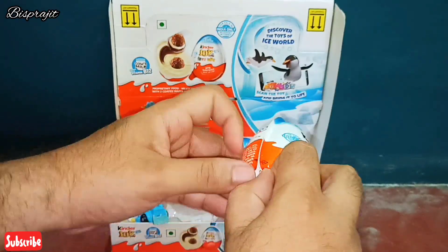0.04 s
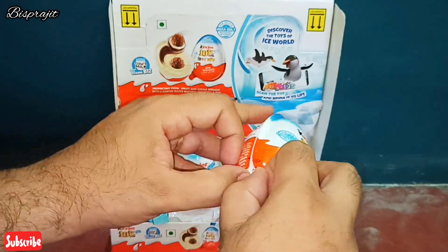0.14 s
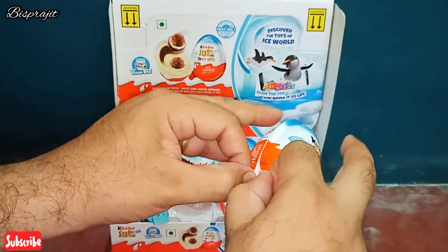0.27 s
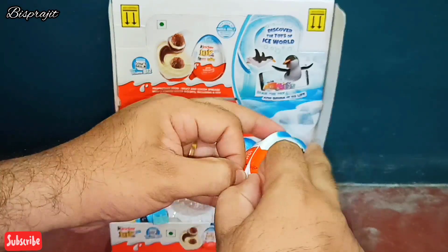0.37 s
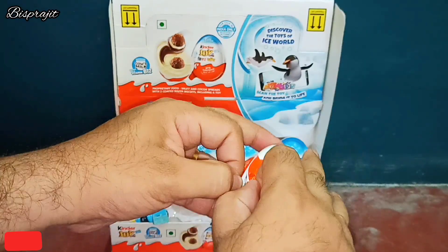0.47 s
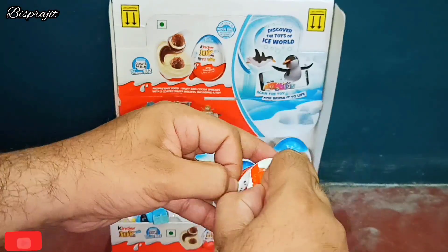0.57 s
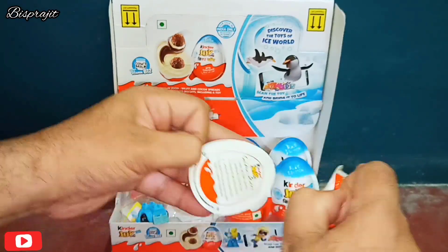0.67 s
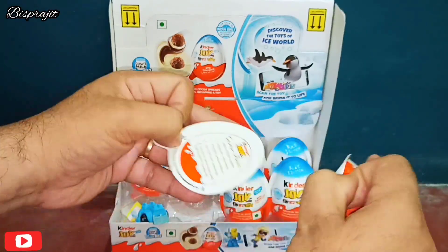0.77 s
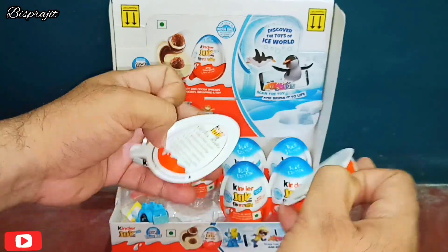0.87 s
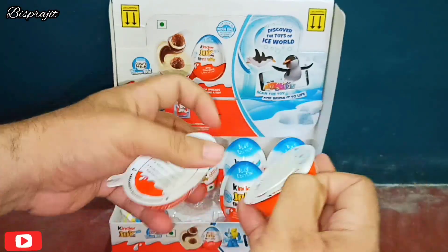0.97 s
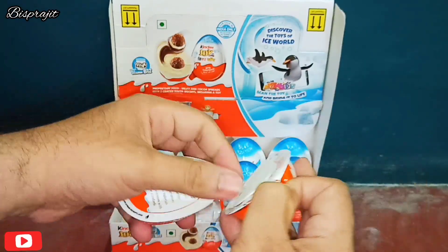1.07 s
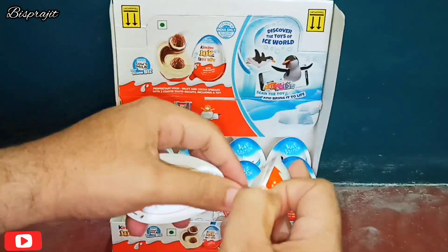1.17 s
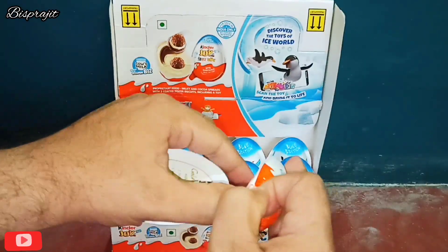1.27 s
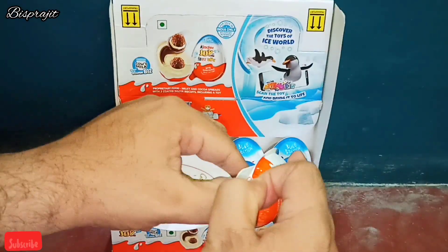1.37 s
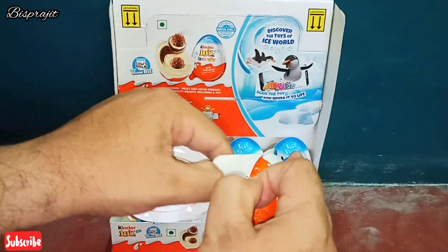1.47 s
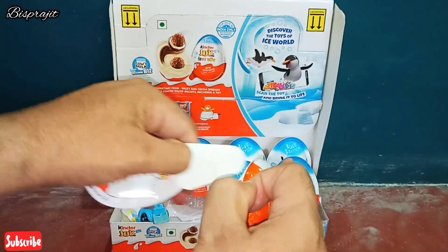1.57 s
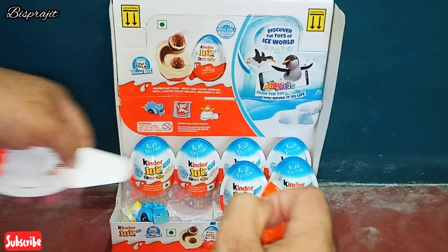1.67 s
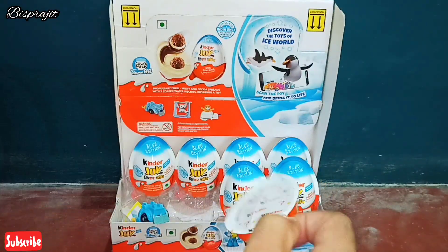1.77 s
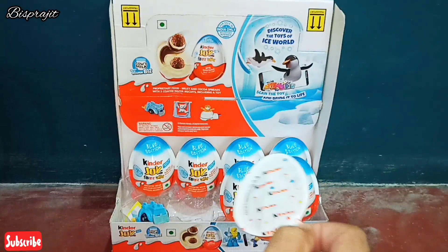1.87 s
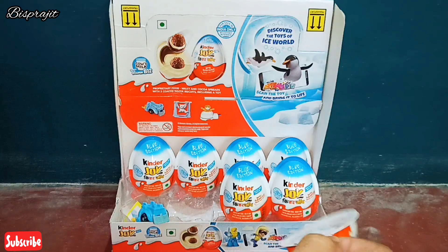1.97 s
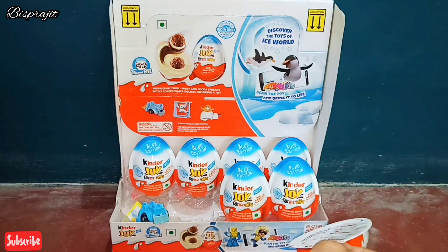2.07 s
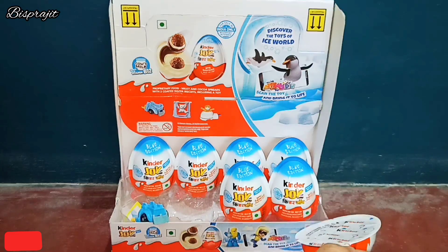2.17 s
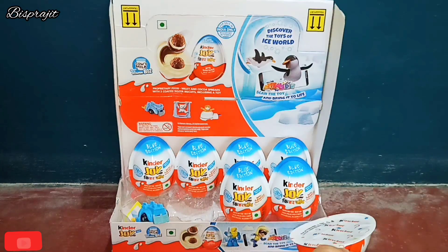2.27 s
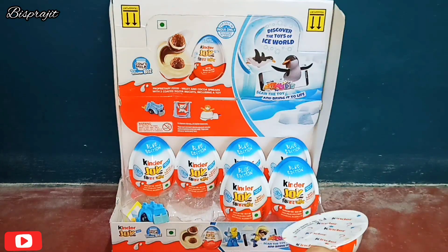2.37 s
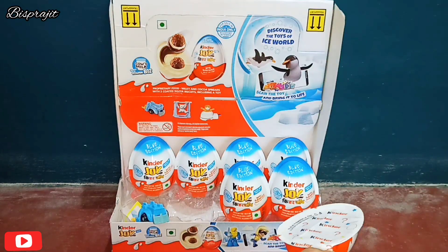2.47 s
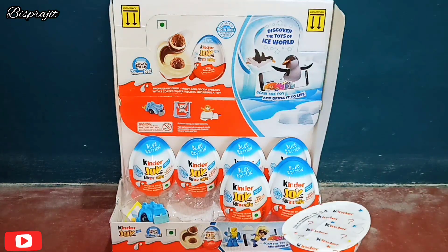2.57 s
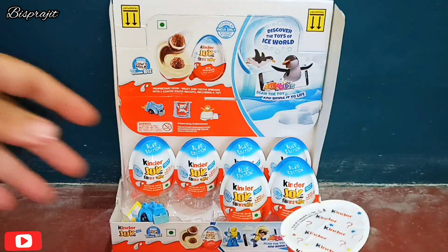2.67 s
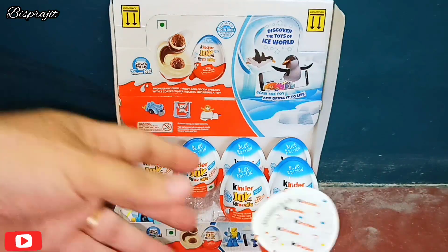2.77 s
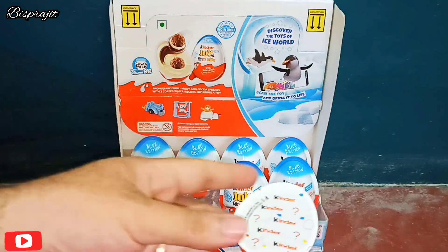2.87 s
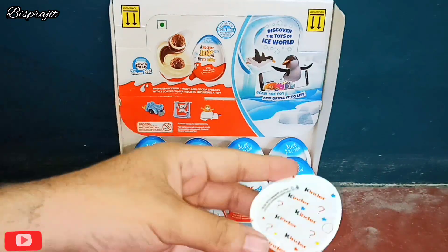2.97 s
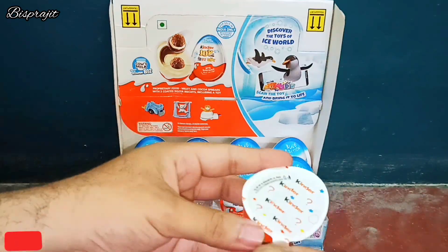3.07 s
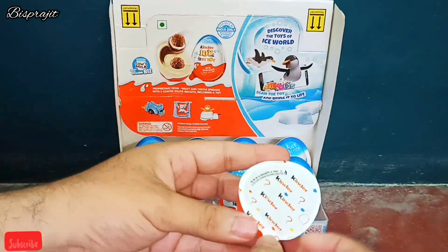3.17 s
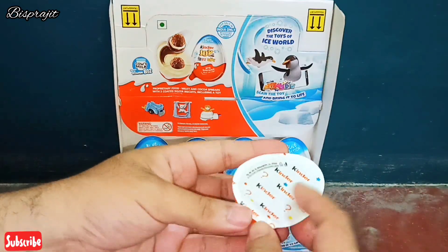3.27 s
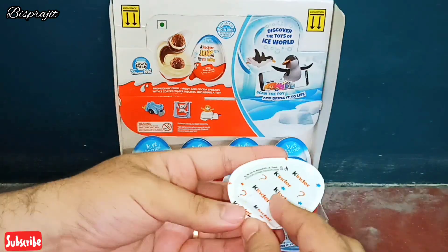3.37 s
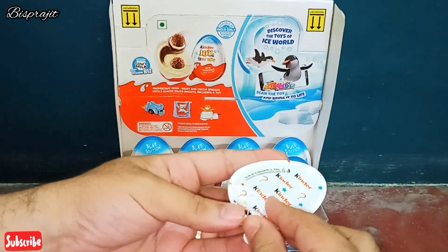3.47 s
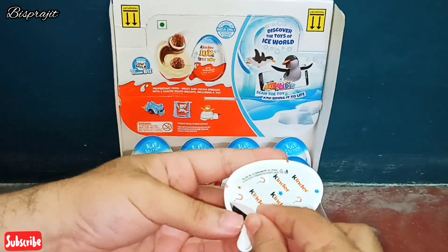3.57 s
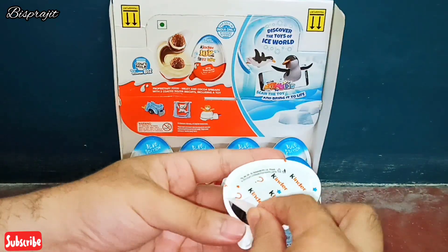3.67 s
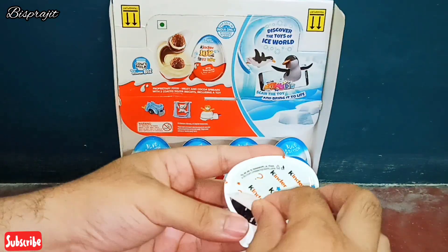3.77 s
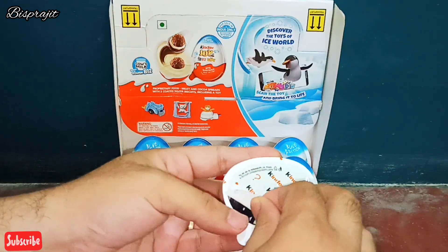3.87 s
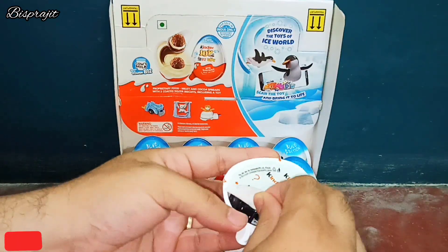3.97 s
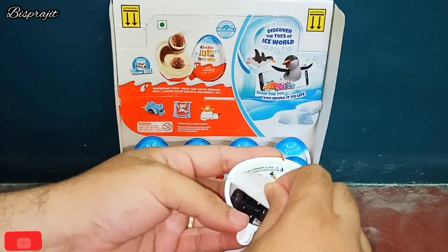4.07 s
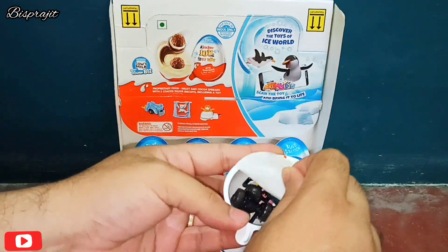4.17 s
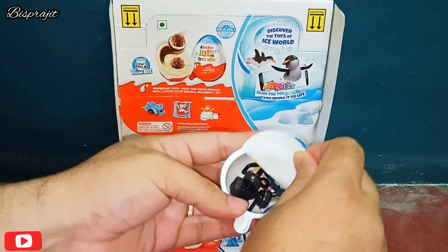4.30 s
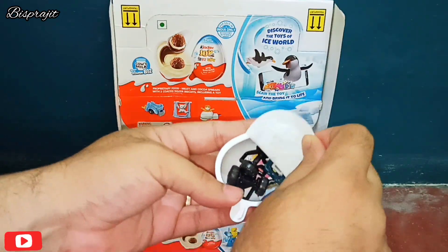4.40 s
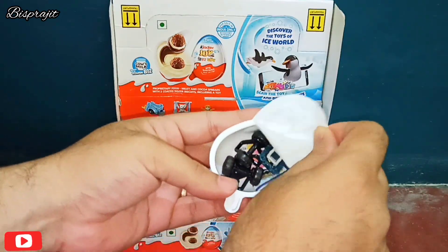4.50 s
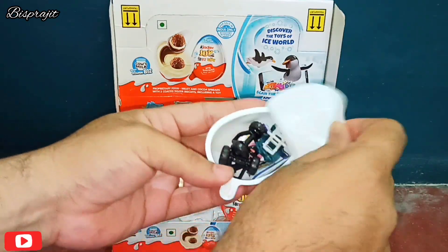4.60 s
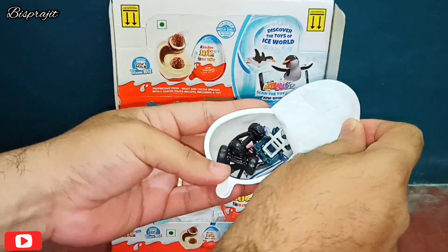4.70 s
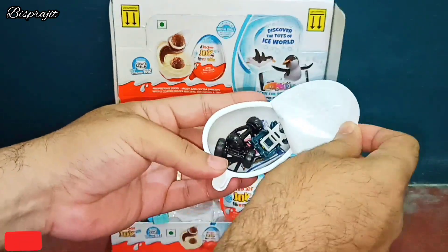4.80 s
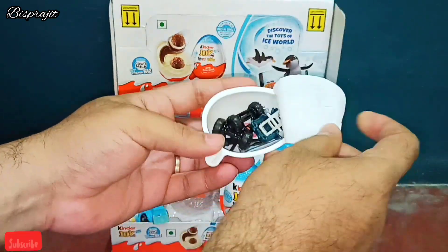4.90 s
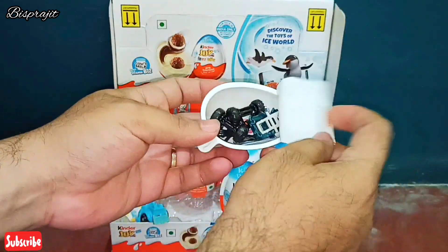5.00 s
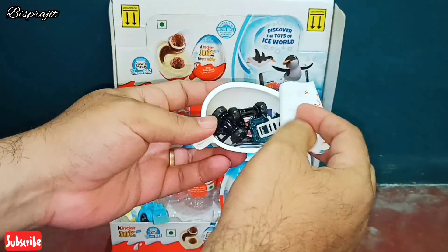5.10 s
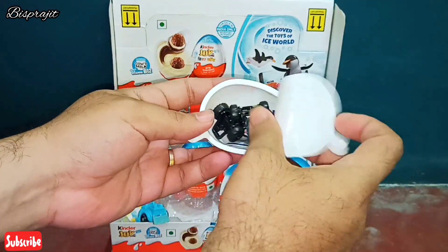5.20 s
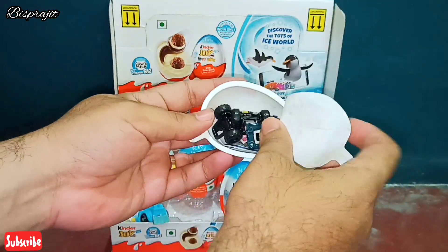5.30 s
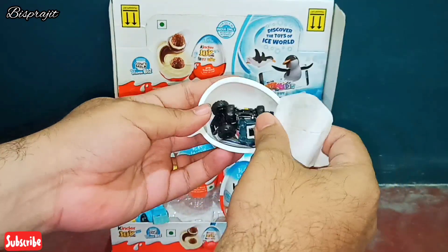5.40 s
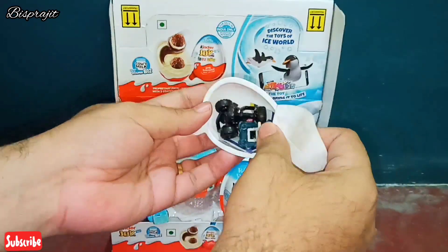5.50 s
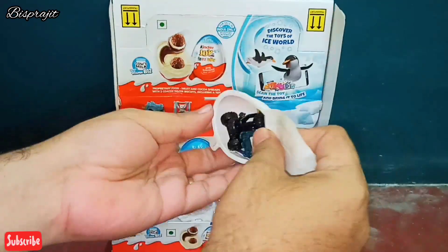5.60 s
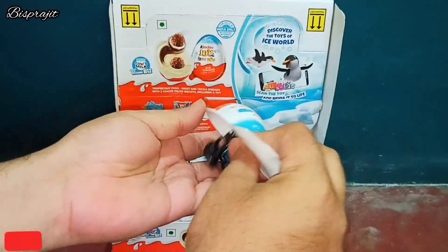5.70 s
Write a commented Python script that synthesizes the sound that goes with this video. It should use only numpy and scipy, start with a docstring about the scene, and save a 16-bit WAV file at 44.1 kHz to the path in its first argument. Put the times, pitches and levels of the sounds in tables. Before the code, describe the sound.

Close to a phone microphone in a small, hard, echoing room, hands split a light plastic egg: a burst of snaps and a short rip, then more sharp cracks and clicks. A quiet lull with faint taps follows, then a nail picks at a foil lid and it peels off in dense, bright, irregular crackles over faint rumble.

```python
"""Faint hiss and a low rumble come first, then small ticks, before hands crack a plastic egg capsule in two.
One half is set down and picked up, and the foil lid peels off the other in bursts of sharp snaps.
Each snap is a buckling impulse that rings a foil facet, the thin shell and the air in the cup; the seam
rips once as a dense run of ticks. Rumble and murmur are filtered noise; short hums are resonated impulses.
A small hard-walled room answers snaps, ticks and hums, close to a phone microphone."""
import sys
import numpy as np
from scipy import signal
from scipy.fft import rfft, irfft
from scipy.io import wavfile
from scipy.ndimage import uniform_filter1d

SR = 44100
rng = np.random.default_rng(int(sys.argv[2]) if len(sys.argv) > 2 else 0)


def output_pcm(signal):
    """Save a mono or channel-first signal as 16-bit PCM at the path in sys.argv[1].

    Samples are clipped to [-1, 1] before scaling.
    """
    pcm = np.clip(np.atleast_2d(signal).T, -1, 1) * 32767
    wavfile.write(sys.argv[1], SR, np.round(pcm).astype(np.int16))


N = 253486
TIME = np.arange(N) / SR

# Buckling of foil and shell: the halves crack apart, fingers pull at one half, the other is set down and
# picked up, a nail picks at the lid, the lid peels back, the loose lid flexes.
# [t/s, level/dB, foil f/Hz, snap length/ms, shell f/Hz, shell/dB re level, room/dB re level]
BUCKLES = [(.2839, -52.5, 4770, 1.65, 1770, -8.5, 1.5), (.5164, -56.5, 5830, 1.8, 1580, -11, 1.5),
           (0.5599, -54, 5100, 1.54, 1720, -10.5, 2), (0.6504, -27.5, 5970, 1.96, 1810, -25, 1),
           (0.6599, -28.5, 6340, 1.28, 1900, -6.5, 0), (0.6656, -29, 5480, 2.5, 1300, 0.5, -5.5),
           (0.6669, -24, 5600, 2.43, 1630, -10.5, -4.5), (.7035, -24.5, 6560, 1.57, 1990, -10, 5.5),
           (0.8494, -31, 4470, 3.06, 1810, -9.5, 0), (0.8703, -25, 3800, 1.27, 2000, -5.5, -2.5),
           (0.8756, -30, 3860, 2, 1940, -3, -5), (0.8932, -45, 3100, 3.9, 1920, 13, -40.5),
           (1.171, -56, 4230, 4.3, 1910, -4.5, -12.5), (1.1875, -44.5, 5500, 2.56, 1400, -3.5, 1),
           (1.229, -40.5, 4810, 1.2, 1570, -8.5, -2), (1.3807, -27, 5300, 1.37, 2383, -8, -3),
           (1.422, -35, 4400, 3.27, 1160, 0.5, 1.5), (1.4387, -23, 5910, 0.58, 1650, -14, -10),
           (1.475, -24, 6250, 1.93, 1570, -7, -1.5), (1.506, -32, 6540, 1.6, 1390, -4.5, -3),
           (1.5219, -17.5, 6710, 2.75, 1390, -7.5, 0.5), (1.645, -37, 5000, 3.9, 1610, 4.5, -1.5),
           (1.7997, -31.5, 4470, 1.2, 1870, 1, -1.5), (1.8385, -42.5, 5100, 2.7, 1640, 3, -6.5),
           (1.8494, -17.5, 6120, 1.24, 1620, -12, -1), (1.859, -29.5, 7850, 1.03, 1510, -0.5, -13),
           (1.9649, -45.5, 4900, 1.3, 1460, 4.5, -4), (2.0677, -48.5, 3640, 3.4, 1430, 1.5, 3.5),
           (2.278, -38, 5520, 2.2, 1390, -1.5, 0.5), (2.3593, -47.5, 4550, 2.7, 1820, 3, -24),
           (2.564, -55, 5360, 0.98, 1650, -14.5, 2.5), (2.964, -61.5, 3470, 3.6, 1557, 10, -1),
           (3.2513, -41, 4300, 3.7, 1405, -6.5, -0.5), (3.3459, -46, 3180, 1.8, 1540, 3, -2),
           (3.434, -25.5, 5000, 1.43, 1870, -15, -1.5), (3.5559, -27.5, 4900, 1.23, 1470, -11, -4.5),
           (3.5666, -34, 5330, 2.9, 1370, -9, -5), (3.729, -41, 7740, 1, 1510, -28, -3.5),
           (3.7932, -55.5, 6400, 1.3, 1350, -14, 2.5), (3.84, -48, 4520, 2.4, 1400, 3, -2.5),
           (3.916, -59, 3400, 1.26, 1350, 4, 1), (3.982, -32.5, 4900, 1.68, 1450, -5, 4),
           (3.9863, -33, 6000, 1.5, 1520, -0.5, -5.5), (4.1009, -48.5, 5320, 1.2, 1470, 10.5, -8),
           (4.1248, -32, 4520, 1.25, 1760, -4.5, -11.5), (4.139, -21.5, 4830, 1.65, 1910, -14.5, -2),
           (4.1471, -30.5, 5400, 1.9, 1580, -18, -16), (4.174, -29.5, 5000, 2, 1610, -3, -2),
           (4.1924, -19, 5060, 1.42, 1810, 0, -10), (4.2018, -19.5, 4570, 1.7, 1790, -5.5, 1.5),
           (4.2064, -15.5, 5900, 1.82, 1990, -4.5, -7.5), (4.323, -29, 4300, 1.5, 1970, -8.5, -1),
           (4.426, -35, 5000, 1.7, 1610, -6, -1.5), (4.4941, -31.5, 7050, 1.26, 1820, -14.5, -1),
           (4.5729, -20, 3900, 2.4, 1610, -10.5, -4), (4.623, -35, 5260, 2.3, 1750, -14, -17),
           (4.6556, -18, 4680, 2.05, 1650, -9, 1), (4.6562, -25, 10000, 1.2, 1730, -23, -5),
           (4.6677, -21.5, 4680, 1.75, 2320, 1, -5.5), (4.8894, -31, 4750, 1.13, 1670, -13, -3.5),
           (4.9455, -39.5, 8200, 2.4, 1400, -11, -10), (5.0594, -32.5, 4800, 2.4, 1830, -7.5, -1.5),
           (5.101, -28, 5660, 0.43, 1670, -30, -1), (5.1254, -43.5, 5980, 2.8, 1190, -6, -0.5),
           (5.2183, -48, 5600, 2.9, 1920, 2, 1), (5.2531, -21.5, 5120, 1.01, 1950, -14.5, -5),
           (5.2731, -31.5, 4940, 4.3, 1840, -5.5, -2.5), (5.28, -32, 5300, 1.2, 2070, -22, -30),
           (5.421, -30, 6100, 1.73, 2010, -17, -3.5), (5.471, -37, 5130, 1, 1750, -9, -2),
           (5.5572, -43, 7100, 2.24, 1800, -10.5, -5.5)]
# Level of the low rumble and murmur, which sinks in pauses [t/s, level/dB]
RUMBLE_LEVELS = [(0.0, -64.5), (0.57, -78), (0.74, -75), (0.97, -51.5), (1.14, -95), (1.25, -64.5),
                 (1.39, -60), (1.44, -58), (2.1, -51.5), (2.11, -57.5), (2.63, -58), (2.7, -62.5),
                 (3.17, -62), (3.46, -53.5), (3.84, -58.5), (4.48, -51.5), (5.41, -49.5), (5.75, -62)]


def undb(db):
    """Level as a logarithm of amplitude: decibels to gain."""
    return 10 ** (np.asarray(db) / 20)


def unit(x):
    """Normalization of mean power: scale to rms 1."""
    return x / np.sqrt(np.mean(x ** 2))


def curve(rows):
    """Linear interpolation of the second column of a table over time."""
    rows = np.asarray(rows)
    return np.interp(TIME, rows[:, 0], rows[:, 1])


def along_hz(points, hz):
    """Interpolation of (f/Hz, value) points on a logarithmic frequency axis."""
    points = np.asarray(points)
    return np.interp(np.log(np.maximum(hz, 1)), np.log(points[:, 0]), points[:, 1])


def response(points, size=4096):
    """Minimum phase: folding the cepstrum gives a causal impulse response with the given spectrum."""
    gain = undb(along_hz(points, np.fft.rfftfreq(size, 1 / SR)))
    cepstrum = irfft(np.log(gain))
    cepstrum[1:size // 2] *= 2
    cepstrum[size // 2 + 1:] = 0
    return irfft(np.exp(rfft(cepstrum)))[:size // 2]


def colour(x, points):
    """Linear filtering: convolution imposes the spectrum of (f/Hz, level/dB) points."""
    return signal.fftconvolve(x, response(points))[:len(x)]


def resonate(x, hz, width_hz):
    """Resonance of a single damped mode, gain 1 at its centre."""
    return signal.lfilter(*signal.iirpeak(hz, hz / width_hz, fs=SR), x)


def add(track, s, sound):
    """Superposition: mix a sound in at time s."""
    start = max(int(s * SR), 0)
    track[start:start + len(sound)] += sound[:N - start]


def steady_hiss(level_db=-65):
    """Stationary random noise with a shaped spectrum."""
    # [f/Hz, level/dB per Hz]
    hiss_colour = [(30, -20), (60, -1.5), (85, 3), (130, -3), (190, -5.5), (350, -7), (600, -16.5),
                   (1500, -20), (4000, -29), (6500, -37.5), (7400, -19), (8600, -31), (10500, -39.5),
                   (16000, -33.5)]
    return unit(colour(rng.standard_normal(N), hiss_colour)) * undb(level_db)


def rumble_and_murmur(rumble_db=-4.0, murmur_db=-6.0, wobble_db=1.85, size=1400):
    """Amplitude-modulated noise: a low rumble and a murmur above it, at a slowly wavering level."""
    # Colours of the rumble and of the murmur [f/Hz, level/dB per Hz]
    rumble_colour = [(25, -41.5), (42, -26), (60, -2.5), (85, 3.5), (105, -8.5), (135, -1.5), (180, -7.5),
                     (300, -11), (600, -35.5)]
    murmur_colour = [(120, -19), (220, -4), (330, 6.5), (420, -4.5), (520, 2.5), (700, -3), (830, -15),
                     (3000, -26)]
    # two moving averages leave a slow drift
    drift = uniform_filter1d(uniform_filter1d(rng.standard_normal(N), size), size)
    wobble = undb(wobble_db * unit(drift))
    rumble = unit(colour(rng.standard_normal(N), rumble_colour) * wobble) * undb(rumble_db)
    murmur = unit(colour(rng.standard_normal(N), murmur_colour) * wobble) * undb(murmur_db)
    return (rumble + murmur) * undb(curve(RUMBLE_LEVELS))


def buckle(length_s, kick=0.12, kick_s=0.0023, size=2048):
    """Snap-through force: a sudden kick, then a random-sign flutter that decays exponentially."""
    t = np.arange(size) / SR
    fade = np.exp(-t / length_s) + kick * np.exp(-t / kick_s)
    return fade * rng.choice([-1, 1], size)


def snaps(spread=0.71, widening=0.91, wall_width_hz=700, ring_db=2.0):
    """Impulsive excitation: each buckle rings foil, shell and cup; returns direct and wall-bound sound."""
    # Colours of a foil facet, a snap's crisp edge and the cup's air [f/Hz, level/dB per Hz]
    facet_colour = [(300, -41), (1200, -19), (2400, 10.5), (4000, 6.5), (7300, 6.5), (8900, 1), (10000, -3),
                    (16000, -15.5)]
    edge_colour = [(5000, -36), (8000, 5.5), (9500, -5), (11500, -3.5), (13000, -3), (14500, 2),
                   (16000, -13.5)]
    cup_colour = [(60, -21), (140, -12.5), (320, -9), (610, -4.5), (860, -3), (1400, -11), (3000, -29)]
    # Modes of the hollow half shell [f/Hz, width/Hz, level/dB]
    shell_modes = [(853, 52, 3.5), (1000, 32, 3), (1430, 53, -14), (1470, 130, -5), (1628, 47, -4),
                   (1900, 26, -4.5), (2010, 110, -10)]
    # an ordinary snap, from which the rules below depart
    usual_db, usual_hz, usual_ms, usual_shell_hz = -32, 5000, 1.7, 1680
    # the force on each body lasts this many times the snap length
    foil_stretch, shell_stretch, edge_stretch, cup_stretch = 1.5, 2.4, 1, 3.3

    direct, thrown = np.zeros(N), np.zeros(N)
    facet, edge, cup = response(facet_colour), response(edge_colour), response(cup_colour)
    for s, db, foil_hz, ms, shell_hz, shell_rel, room_rel in BUCKLES:
        length_s = ms / 1000
        # smaller, higher facets have a crisper edge (11 dB per octave)
        edge_rel = -9.5 + 11 * np.log2(foil_hz / usual_hz)
        # the cup thuds more under a longer push (5 dB per doubling)
        thud_rel = -14 + 5 * np.log2(ms / usual_ms)
        # it grows more slowly than the snap
        thud_rel -= 0.21 * (db - usual_db)
        # a soft, low part of the shell passes more of the push to the cup (dB per octave)
        thud_rel -= 9.5 * np.log2(shell_hz / usual_shell_hz)

        # a short snap flips a single facet and rings in a narrow band; a long one flips several
        width_hz = foil_hz * min(spread * ms ** widening, 1.3)
        foil = resonate(resonate(facet, foil_hz, width_hz), foil_hz, width_hz)
        # where the shell is pressed decides which of its modes speak
        wall = resonate(signal.unit_impulse(len(cup)), shell_hz, wall_width_hz)
        wall = resonate(wall, shell_hz, shell_hz)
        ringing = sum(undb(gain_db) * resonate(wall, hz, width) for hz, width, gain_db in shell_modes)
        shell = wall + undb(ring_db) * ringing

        bodies = [(foil, 0, foil_stretch), (shell, shell_rel, shell_stretch),
                  (edge, edge_rel, edge_stretch), (cup, thud_rel, cup_stretch)]
        for body, rel, stretch in bodies:
            # a snap's level is its energy spread over five milliseconds
            gain = undb(db + rel) * np.sqrt(.005 * SR / len(body))
            struck = signal.fftconvolve(buckle(length_s * stretch), body)[:len(body)]
            add(direct, s, gain * unit(struck))
            # the walls hear all directions at once, which evens out the ripple of the flutter
            add(thrown, s + length_s * rng.random(), gain * undb(room_rel) * unit(body))
    return direct, thrown


def crackle(rate, scatter_db, count=4):
    """Poisson impulse noise: tiny buckles of uneven size, shared among facets with their own flutter."""
    # Colour of a crease [f/Hz, level/dB per Hz]
    tick_colour = [(80, -11.5), (150, -9), (260, -6), (450, 2.5), (1700, 0), (3000, -1.5), (5000, 6.5),
                   (8000, -3.5), (10000, -13), (15000, -11)]
    out = np.zeros(N)
    for _ in range(count):
        sizes = undb(scatter_db * np.minimum(rng.exponential(size=N), 2.5))
        ticks = (rng.random(N) < rate / count / SR) * sizes
        out += signal.oaconvolve(ticks, unit(buckle(0.00014)))[:N]
    return unit(colour(out, tick_colour))


def strain(stray_db=-16, settle_db=-25.5, settle_db_per_s=92.5):
    """Addition of powers: creases follow the rumble level, settle after snaps and swell in crumples."""
    # A patch of foil crumples [t/s, length/s, level/dB]
    crumples = [(1.498, 0.067, -36), (2.14, .13, -64.5), (2.284, 0.061, -47.5), (2.964, 0.32, -68.5),
                (4.134, .03, -40), (4.891, 0.021, -40), (5.663, 0.123, -62)]
    rise_db_per_s, fall_db_per_s = 1097.5, 263.5
    power = undb(curve(RUMBLE_LEVELS) + stray_db) ** 2
    settling = undb(settle_db - settle_db_per_s * TIME[:SR])
    for s, db, *_ in BUCKLES:
        add(power, s, (undb(db) * settling) ** 2)
    for s, length_s, db in crumples:
        before = rise_db_per_s * (s - TIME)
        after = fall_db_per_s * (TIME - s - length_s)
        below = np.maximum(np.maximum(before, after), 0)
        power += undb(db - below) ** 2
    return np.sqrt(power)


def tearing():
    """Progressive fracture: the seam lets go in a fast run of ticks; the strained foil ticks faintly."""
    # The seam between the halves rips open [t/s, level/dB]
    seam_levels = [(.661, -76.5), (.675, -29), (.701, -43.5), (.724, -31), (.756, -35.5), (.791, -36.5),
                   (.831, -37), (.88, -89)]
    seam = crackle(1200, 6.9) * undb(curve(seam_levels))
    creases = crackle(300, 4.6) * strain()
    return seam + creases


def short_hums(impulse_rate=900, width_share=.22, trim_db=-0.5):
    """Resonance under random excitation: sparse impulses (impulse_rate per second) sound as soft hums."""
    # Short soft hums, low to middle in pitch [t/s, length/s, f/Hz, level/dB before the trim]
    hum_rows = [(.661, 0.17, 139, -61.5), (0.677, 0.098, 432, -50.5), (1.495, 0.064, 1090, -35.5),
                (2.301, 0.095, 1800, -54), (3.723, 0.27, 660, -66), (4.412, 0.19, 640, -55.5),
                (4.542, 0.03, 360, -48), (4.65, 0.034, 287, -42.5), (4.917, 0.062, 493, -54),
                (5.248, .27, 305, -58.5)]
    out = np.zeros(N)
    for s, length_s, hz, db in hum_rows:
        size = int(length_s * SR)
        impulses = (rng.random(size) < impulse_rate / SR) * rng.standard_normal(size)
        impulses += 1e-9  # never wholly silent, so that the rms can be scaled
        ring = resonate(resonate(impulses, hz, width_share * hz), hz, 2 * width_share * hz)
        add(out, s, unit(ring * signal.windows.tukey(size, .5)) * undb(db + trim_db))
    return out


def room(x, first_s=0.011, first_gain=0.4, build_s=0.015, wet_db=-1.4, count=12):
    """Reverberation: a first bounce off the near wall, a dense tail decaying band by band, and room modes."""
    # Reverberation time [f/Hz, T60/s]
    t60 = [(100, 0.98), (400, 0.4), (1600, 0.48), (4000, 0.43), (8000, 0.43), (15000, 0.32)]
    # Pitches that linger in the room [f/Hz, level/dB re whole dense tail]
    linger = [(135, -17.5), (305, -33.5), (807, -29), (1125, -22), (1331, -27), (1548, -33), (1662, -27.5),
              (1790, -23), (1904, -29.5)]
    # Colour of the walls [f/Hz, level/dB]
    wall_colour = [(100, -1.7), (400, 1), (900, -2), (1700, -1.2), (3000, -0.1), (5000, -1.8),
                   (8000, -0.12), (11000, 0.75), (15000, 2.2)]

    t = np.arange(SR) / SR
    hz = np.fft.rfftfreq(SR, 1 / SR)
    noise = rfft(rng.standard_normal(SR))
    edges = np.geomspace(50, SR / 2, count + 1)
    tail = np.zeros(SR)
    for lo, hi in zip(edges, edges[1:]):
        band = irfft(noise * ((hz >= lo) & (hz < hi)), SR)
        # a fall by a factor of 1000 is 60 dB
        tail += band * np.exp(-np.log(1000) * t / along_hz(t60, np.sqrt(lo * hi)))
    tail *= np.clip((t - first_s / 2) / build_s, 0, 1) ** .5
    tail /= np.linalg.norm(tail)
    for mode_hz, db in linger:
        mode = np.sin(2 * np.pi * mode_hz * t) * np.exp(-np.log(1000) * t / along_hz(t60, mode_hz))
        tail += undb(db) * mode / np.linalg.norm(mode)
    tail[int(first_s * SR)] += first_gain
    return undb(wet_db) * signal.fftconvolve(x, colour(tail, wall_colour))[:N]


def scene(tick_echo_db=-4.5):
    """Superposition of direct snaps, ticks and hums, their echo, the rumble and a faint steady hiss."""
    direct, thrown = snaps()
    ticks_and_hums = tearing() + short_hums()
    echo = room(thrown + undb(tick_echo_db) * ticks_and_hums)
    return (direct + ticks_and_hums + echo + rumble_and_murmur() + steady_hiss())[None]


def suppress(x, open_db=-55, slope=1.2, depth_db=8, window_s=.04, split_hz=900, treble_share=1.25):
    """Downward expansion: the further the sound sinks under a threshold, the lower its gain, treble most."""
    power = uniform_filter1d(x ** 2, int(window_s * SR))
    level_db = 10 * np.log10(np.maximum(power, 1e-12))
    gain_db = np.clip(slope * (level_db - open_db), -depth_db, 0)
    bass = signal.sosfiltfilt(signal.butter(2, split_hz, fs=SR, output="sos"), x)
    treble = x - bass
    return bass * undb(gain_db) + treble * undb(treble_share * gain_db)


def record(dry, bass_hz=48, top_hz=15600):
    """Band limiting and saturation: the phone thins deep bass, hushes pauses, rounds peaks, cuts the top."""
    thinned = signal.sosfilt(signal.butter(2, bass_hz, "high", fs=SR, output="sos"), dry)
    rounded = np.tanh(suppress(thinned))
    return signal.sosfilt(signal.ellip(10, .2, 70, top_hz, fs=SR, output="sos"), rounded)


dry = scene()
out = record(dry)
output_pcm(out)
```